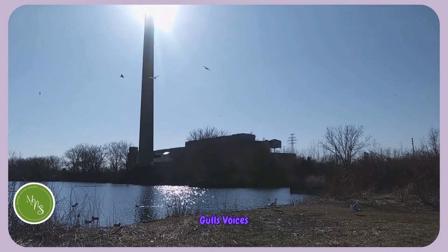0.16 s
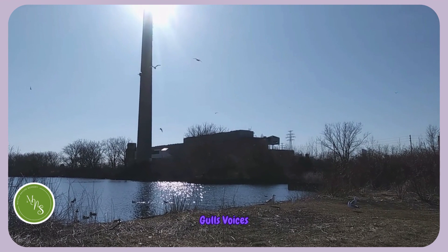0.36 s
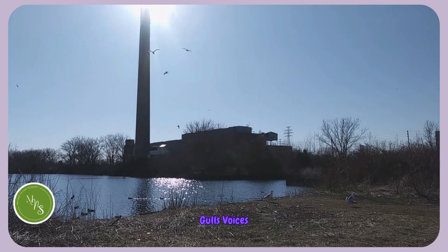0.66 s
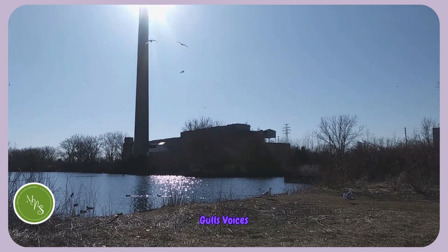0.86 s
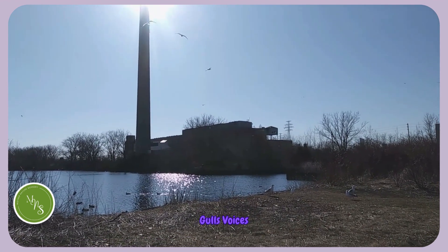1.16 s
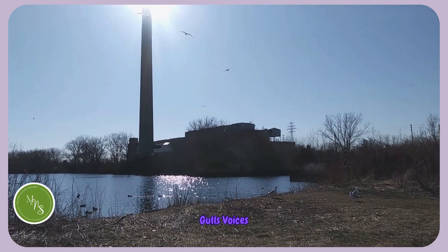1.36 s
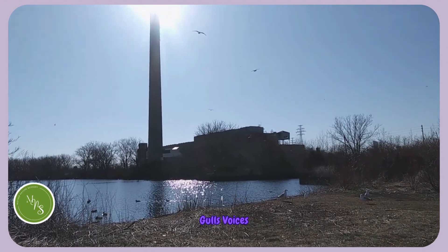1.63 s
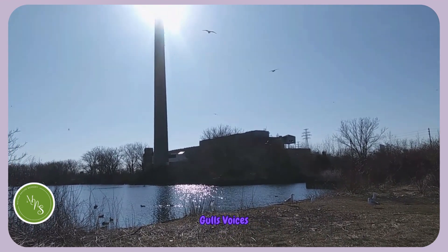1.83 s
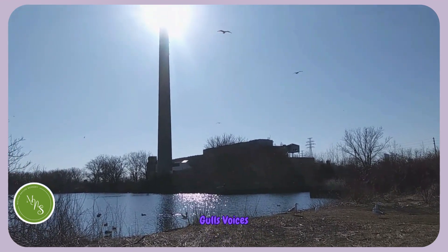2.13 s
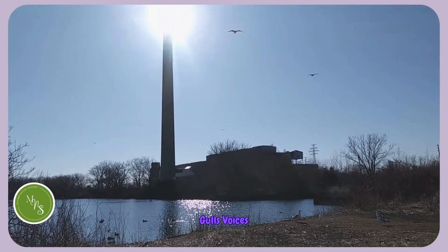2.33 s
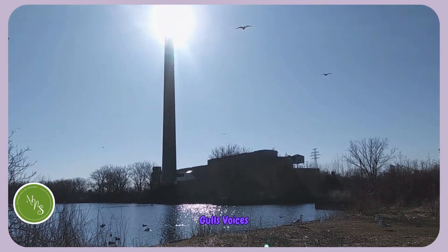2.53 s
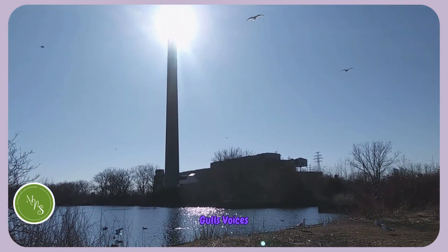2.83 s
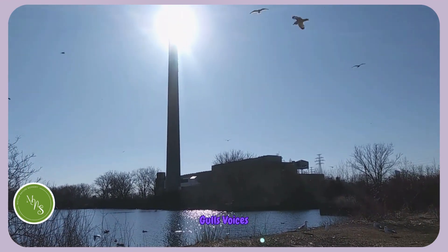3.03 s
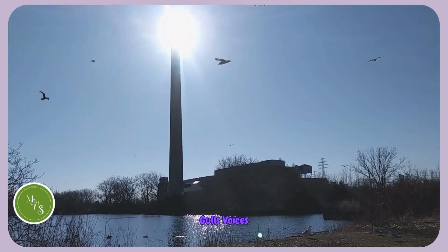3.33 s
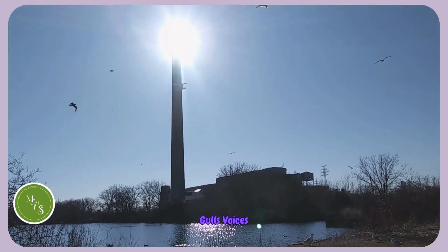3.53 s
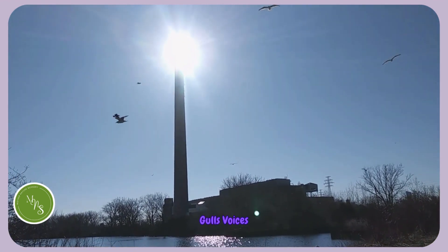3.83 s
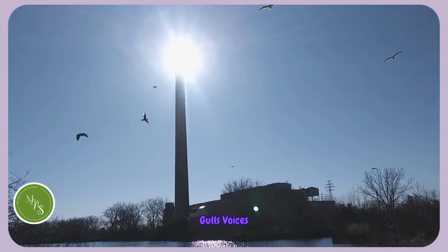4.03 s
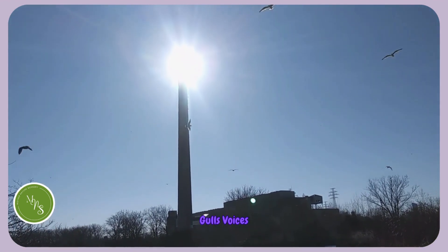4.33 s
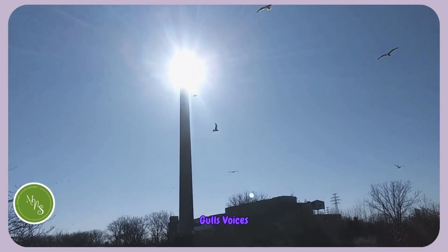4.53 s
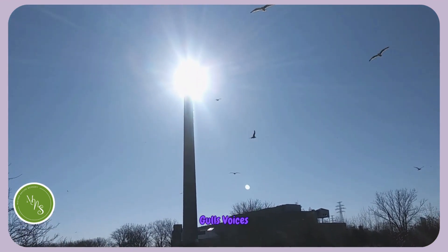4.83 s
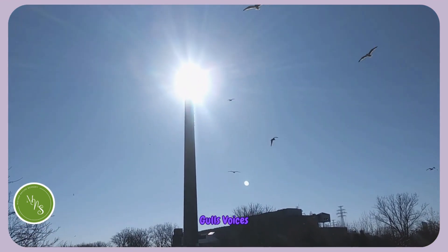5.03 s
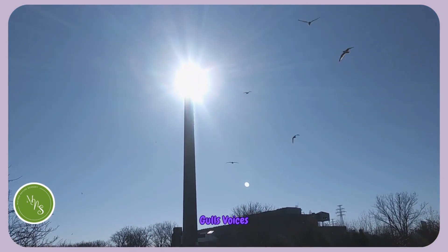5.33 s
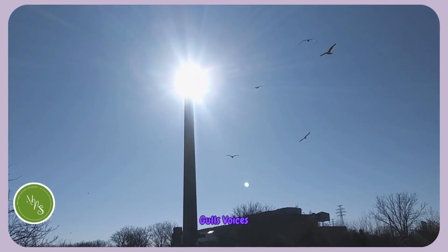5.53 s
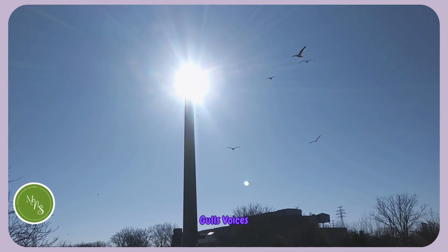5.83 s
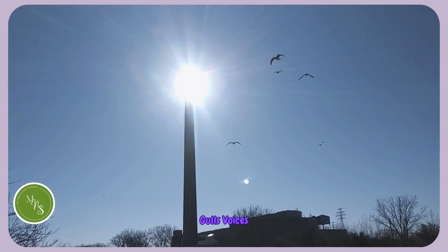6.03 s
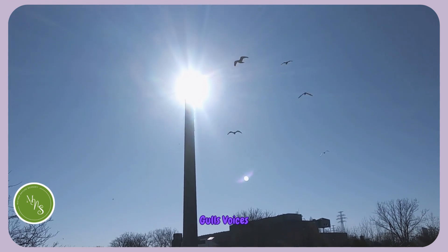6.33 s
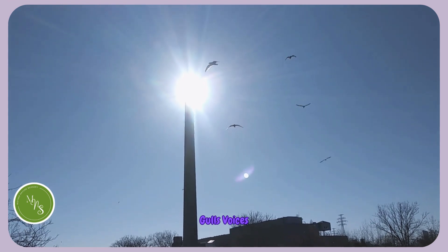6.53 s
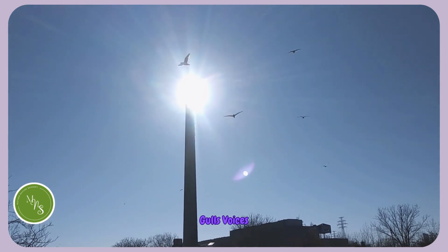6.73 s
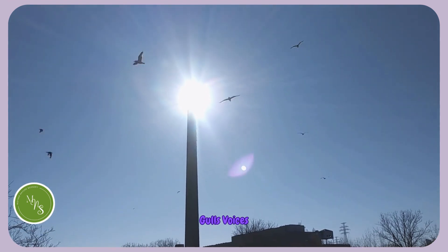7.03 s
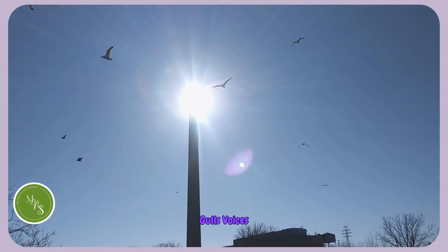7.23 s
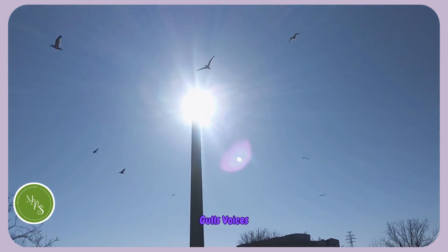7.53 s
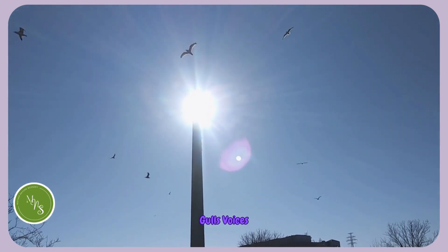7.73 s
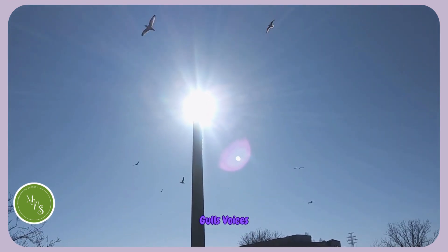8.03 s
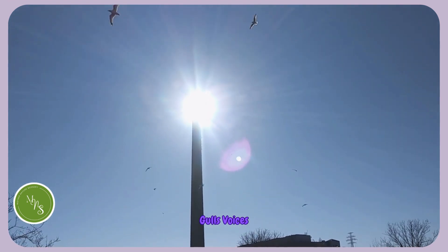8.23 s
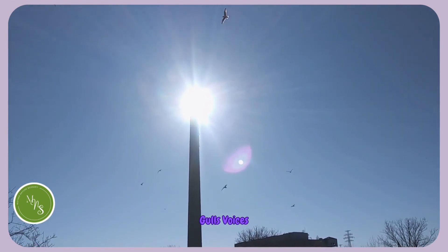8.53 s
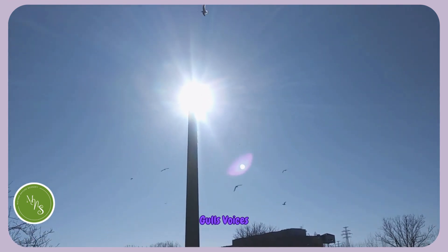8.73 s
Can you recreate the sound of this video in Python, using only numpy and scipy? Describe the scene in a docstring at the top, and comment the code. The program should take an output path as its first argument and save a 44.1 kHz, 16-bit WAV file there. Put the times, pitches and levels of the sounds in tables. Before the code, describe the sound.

Outdoors beside a pond, a gull's clear high whistle opens, then several gulls overlap with yelps, squawks, whistles and hoarse breaking cries. A fainter flock yelps across the water. Soft low wind thumps the small microphone in the first four seconds, then fades. A small bird chips evenly midway, distant trills and one falling buzz follow, and the gulls become nearer and busier, with a thin echo.

```python
"""A gull's clear whistle comes first, then gulls cry across one another over a pond: whistles, yelps,
squawks and hoarse breaks, each a harmonic stack shaped by a throat resonance.
A far flock yelps faintly, a small bird chips, swept tones trill far off and a marsh bird buzzes once.
Sparse reflections from the banks return a thin echo of the birds.
Wind, as band-limited noise, buffets the microphone at first and then dies down."""
import sys
import numpy as np
from scipy import signal
from scipy.io import wavfile
from scipy.ndimage import uniform_filter1d

SR = 44100
rng = np.random.default_rng(int(sys.argv[2]) if len(sys.argv) > 2 else 0)


def output_pcm(signal):
    """Save a mono or channel-first signal as 16-bit PCM at the path in sys.argv[1].

    Samples are clipped to [-1, 1] before scaling.
    """
    pcm = np.clip(np.atleast_2d(signal).T, -1, 1) * 32767
    wavfile.write(sys.argv[1], SR, np.round(pcm).astype(np.int16))


def rack_gain(trim_db):
    """Turn a fader trim in dB into the linear factor to multiply a signal by."""
    fader = np.asarray(trim_db, float)
    return 10 ** (fader / 20)


N = 391608  # samples


def evened(x):
    """Normalization: scales a signal to rms 1."""
    return x / np.sqrt(np.mean(x ** 2))


def add(mix, s, sound):
    """Superposition: mixes a sound in at s seconds."""
    part = mix[round(s * SR):][:len(sound)]
    part += sound[:len(part)]


def wobble(n, hz):
    """Smoothed noise: a random drift of rms 1, up to about hz."""
    size = max(int(SR / hz), 1)
    smooth = uniform_filter1d(rng.standard_normal(n), size)
    return evened(uniform_filter1d(smooth, size))


def band(x, lo_hz, hi_hz, order=2):
    """Band-pass filtering by a Butterworth response."""
    return signal.sosfilt(signal.butter(order, [lo_hz, hi_hz], "band", fs=SR, output="sos"), x)


def gulls():
    """Inefficient radiation: the small bodies of the near birds radiate little bass."""
    out = np.zeros(N)
    for kind in (winding, whistles, brights, yelps, rasps, slurs, endings, squawks, arches, sags):
        for voice, rows in kind():
            add(out, *note(voice, rows))
    return band(out, 880, 22000, order=3)


def note(voice, rows):
    """Source and filter: harmonics under a throat peak, roughened by pitch jitter and chopping."""
    hoarse, throat_hz, fall_db = voice  # hoarseness 0-1, peak Hz, fall above it in dB/octave
    rise_db, flicker_db = 20, 5  # rise below the peak in dB/octave, unevenness of the overtones
    s, hz, db = np.transpose(rows)
    t = np.arange(max(s[0] - .003, 0), s[-1] + .003, 1 / SR)  # neighbours overlap
    glide = uniform_filter1d(np.interp(t, s, hz), 400, mode="nearest")

    slow_shake = (0.0034 + .012 * hoarse) * wobble(len(t), 110)
    jitter = 0.082 * min(hoarse, .7) ** 3 * wobble(len(t), 360)
    phase = 2 * np.pi * np.cumsum(glide * (1 + slow_shake + jitter)) / SR

    k = np.arange(1, 12000 // max(hz) + 1)[:, None]
    peak_line = max(round(throat_hz / np.mean(hz)), 1)
    octaves = np.log2(k / peak_line)
    # each overtone swells and fades on its own every 20 ms, more so away from the peak
    uneven = rng.standard_normal((30, len(t) // 900 + 2))[:len(k)]
    uneven = uneven * (hoarse + np.minimum(abs(octaves), 1))
    slope_db = np.where(octaves > 0, -fall_db, rise_db)
    gains = rack_gain(slope_db * octaves + flicker_db * uneven)
    step = np.arange(len(t)) / 900
    stack = np.zeros(len(t))
    for n, g in zip(k[:, 0], gains):
        stack += np.interp(step, range(len(g)), g) * np.sin(n * phase + n ** 2)

    # an unsteady second vibration near a quarter of the pitch chops the voice into pulses
    pulse_hz = np.minimum(glide, 1000) / 4 * (1 + wobble(len(t), 150) / 3)
    pulses = np.sin(np.cumsum(2 * np.pi / SR * pulse_hz))
    stack *= 1 + (0.065 + 1.42 * hoarse ** 2.05) * (wobble(len(t), 1000) / 2 + pulses)
    edge_s = .006 + .006 * hoarse
    edge = np.clip(np.minimum(t - t[0], t[-1] - t) / edge_s, 0, 1)
    return t[0], rack_gain(np.interp(t, s, db)) * evened(stack) * edge


def held(s, length, from_hz, to_hz, db, change_db):
    """Linear glide: the pitch bulges slightly above a straight line, the level changes evenly."""
    middle_hz = (from_hz + to_hz) / 2 * (1 + .012)
    middle = (s + length / 2, middle_hz, db + change_db / 2)
    return [(s, from_hz, db), middle, (s + length, to_hz, db + change_db)]


# whistles that wind up and down, one list each: t/s, f/Hz, level/dB
WINDING_WHISTLES = [
    [(.06, 3064, -46.5), (.22, 2944, -43.5), (.3, 3037, -42.5), (.44, 2966, -40), (.48, 2850, -39)],
    [(1.04, 2140, -55), (1.1, 2196, -48.5), (1.21, 1900, -65)],
    [(1.71, 2927, -46.5), (1.85, 2980, -48), (2.07, 2967, -41.5), (2.12, 2460, -40)],
    [(2.945, 3176, -41.5), (3.13, 2910, -41.5), (3.2, 3007, -39.5), (3.52, 3034, -34), (3.6, 2840, -35.5)],
    [(4.485, 2970, -34), (4.75, 2996, -37), (4.82, 2900, -35)],
    [(5.51, 1916, -30.5), (5.56, 1958, -33), (5.62, 1748, -35)],
    [(7.9, 2047, -34.5), (7.97, 2142, -33), (8.095, 1978, -29)],
]


def winding():
    """Near-pure tone: the overtones fall more steeply with the square of the pitch."""
    for rows in WINDING_WHISTLES:
        hz = np.mean(rows, axis=0)[1]
        yield (0.024, hz, 4 * (hz / 1e3) ** 2), rows


# held whistles: t/s, duration/s, first f/Hz, last f/Hz, level/dB, change/dB, overtone fall/(dB/octave)
HELD_WHISTLES = [(0, 0.062, 1777, 1889, -44.5, 1, 9.5), (0, 0.036, 1247, 1310, -27, -45, 11),
                 (.87, .06, 1466, 1547, -46.5, 0, 27), (0.921, .13, 1910, 1713, -43, -9, 27),
                 (1.33, 0.11, 2453, 2350, -30.5, -6, 14.5), (1.504, .21, 1676, 1794, -47.5, 4.5, 14.5),
                 (1.595, .115, 1150, 926, -41.5, -4.5, 7), (1.718, .14, 1465, 1372, -50.5, -5.5, 24),
                 (2.094, 0.33, 1920, 1930, -29, -11, 18), (2.422, .1, 1505, 1413, -38.5, -3, 15),
                 (2.882, 0.066, 2394, 2486, -30, -1, 22), (2.949, 0.067, 1463, 1546, -45.5, -2, 27),
                 (3.149, 0.14, 1946, 1706, -40, -18.5, 25), (4.14, .345, 1875, 1775, -40, -4, 13),
                 (4.265, 0.14, 2255, 2120, -43.5, -7, 25), (5.03, .085, 2030, 1960, -52, 4, 35),
                 (5.12, .11, 1850, 1780, -51, -2, 12), (5.202, 0.13, 1213, 1605, -67, 8, 27),
                 (5.31, 0.15, 1900, 1822, -51, 0, 43), (5.617, 0.075, 2175, 1910, -28.5, -9.5, 15.5),
                 (6.782, 0.053, 1523, 1303, -29.5, -21.5, 22), (7.055, .077, 2000, 1965, -23.5, -2, 12),
                 (7.124, 0.077, 2305, 2155, -17.5, -10.5, 12), (7.387, 0.18, 2036, 1956, -30.5, 4.5, 18.5),
                 (8.228, 0.079, 1990, 1958, -53.5, 19, 24.5), (8.398, 0.12, 2060, 1950, -32.5, 7, 16),
                 (8.62, 0.17, 2358, 2235, -41, 8, 18.5)]


def whistles():
    """Resonance at the fundamental: the lowest line is the strongest."""
    for *row, fall_db in HELD_WHISTLES:
        yield (0.024, row[2], fall_db), held(*row)


# bright yelps: t/s, duration/s, first f/Hz, last f/Hz, level/dB, change/dB, overtone fall/(dB/octave)
BRIGHT_YELPS = [(2, 0.11, 782, 856, -33, -8, 19.7), (6.077, 0.059, 799.5, 848, -19, -4, 21.2),
                (6.38, 0.16, 940, 882, -36, -10.5, 22), (6.604, .11, 835, 856, -33.5, 0, 90),
                (6.845, .08, 722.5, 790, -27.5, 5, 19.6), (6.925, 0.028, 803, 721, -19, -10, 20),
                (8.214, 0.11, 862, 852, -33.5, -2, 64), (8.315, 0.052, 823, 887, -23.5, -5, 32)]


def brights():
    """Resonance at a high overtone: a 2500 Hz throat peak makes the third line strongest."""
    for *row, fall_db in BRIGHT_YELPS:
        yield (.04, 2500, fall_db), held(*row)


# clear yelps: t/s, duration/s, first f/Hz, last f/Hz, level/dB, change/dB
CLEAR_YELPS = [(.06, 0.25, 1004, 989, -47.5, -6), (0.197, 0.14, 1107, 1103, -40, -7.5),
               (0.617, 0.14, 927, 896, -33.5, -23), (1.247, 0.088, 944, 1019, -37, 2.5),
               (1.406, 0.044, 900, 991, -36.5, 9.5), (1.45, 0.14, 1191, 1080, -32.5, -6),
               (2.65, 0.064, 564, 740, -35.5, 2), (2.708, 0.078, 745, 805, -34.5, 2),
               (2.777, .09, 838, 711, -22.5, -11.5), (2.721, 0.058, 961, 913, -26.5, -16.5),
               (2.799, 0.095, 946, 985, -33.5, -1.5), (2.962, .16, 1026, 966, -46.5, -7),
               (3.583, 0.075, 956, 914, -38, -7), (4.466, 0.21, 889, 740, -32.5, -4),
               (6.291, 0.046, 785, 870, -27, 5), (6.332, 0.022, 978, 1023, -20.5, -13),
               (7.019, .042, 969.4, 1011, -27, -0.5), (7.308, 0.055, 826, 915, -23.5, 1),
               (7.383, 0.17, 1144, 1081, -34, -9.5), (7.832, 0.046, 824, 908, -24.5, -3),
               (8.41, .11, 930, 867, -35.5, 3.5), (8.698, 0.087, 663.1, 730.6, -33.5, 0),
               (8.81, .03, 942, 1198, -33, 6), (8.841, 0.049, 1169, 1136, -30, 3)]


def yelps():
    """Resonance at a low overtone: a 1745 Hz throat peak mostly favours the second line."""
    for row in CLEAR_YELPS:
        yield (.04, 1745, 17), held(*row)


# rough held notes: t/s, duration/s, first f/Hz, last f/Hz, level/dB, change/dB
ROUGH_NOTES = [(0.132, 0.072, 609, 1080, -38.5, -21.5), (0.422, .06, 881, 972, -39.5, 10),
               (0.478, 0.098, 965, 905, -34, -10.5), (4.115, .03, 956, 935, -38, 2),
               (7.029, .025, 992, 1005, -27.5, -2), (7.356, 0.034, 809, 910, -30, 5),
               (7.868, 0.036, 863, 945, -28, 1.5), (8.27, .11, 736, 793, -30, 7),
               (8.371, .04, 849, 933, -20.5, -8.5), (8.772, 0.03, 1107, 1099, -23, -25)]


def rasps():
    """Irregular vibration: strong hoarseness spreads a rasp around the lines."""
    for row in ROUGH_NOTES:
        yield (.62, 1750, 15.3), held(*row)


# thin rising slurs: t/s, duration/s, first f/Hz, last f/Hz, first level/dB
RISING_SLURS = [(.85, 0.27, 1960, 3600, -54), (1.72, .2, 2220, 3440, -48.5), (2.43, .17, 2310, 3481, -42.5)]


def slurs():
    """Upward frequency sweep: the tone recedes by 15.5 dB as it rises."""
    for row in RISING_SLURS:
        yield (.2, 2900, 24), held(*row, -15.5)


# short dropping ends of cries: t/s, duration/s, first f/Hz, last f/Hz, first level/dB
CRY_ENDINGS = [(2.871, .03, 701, 584, -26.5), (4.674, 0.041, 732, 628, -32),
               (3.603, 0.098, 808, 641, -31.5), (5.694, 0.028, 734, 618, -28.5),
               (7.573, .033, 860, 734, -16.5), (8.093, 0.023, 869, 677, -16)]


def endings():
    """Rapid decay: a cry is cut off by a fall of 32.5 dB."""
    for row in CRY_ENDINGS:
        yield (0.54, 1500, 19), held(*row, -32.5)


# squawks that climb into a cry: t/s, duration/s, first f/Hz, last f/Hz, top level/dB
CLIMBING_SQUAWKS = [(1.219, 0.033, 672, 905, -40), (1.384, 0.034, 593, 1045, -34),
                    (1.922, 0.081, 471, 678, -28.5), (4.08, 0.049, 628, 960, -34.5),
                    (4.411, 0.069, 616, 876, -31.5), (5.428, 0.029, 600, 913, -30),
                    (6.04, 0.041, 511, 609, -22.5), (6.267, 0.029, 706, 780, -23),
                    (6.559, 0.048, 622, 802, -39), (6.802, .045, 491, 673, -25.5),
                    (6.982, 0.042, 596, 916, -25.5), (7.277, 0.037, 629, 750, -23.5),
                    (7.805, 0.042, 591, 775, -26.5), (8.163, 0.058, 605, 796, -38.5),
                    (8.665, 0.043, 560, 658, -33)]


def squawks():
    """Growing rough vibration: pitch climbs while the level swells."""
    swell_db = 9.5
    for *row, top_db in CLIMBING_SQUAWKS:
        yield (.6, 2350, 23.9), held(*row, top_db - swell_db, swell_db)


# arched yelps: t/s, climb/s, sag/s, top f/Hz, sagged f/Hz, top level/dB
ARCHED_YELPS = [(.44, .11, .17, 785.5, 596, -29.5), (3.485, .095, .19, 803, 602, -35)]


def arches():
    """Joint modulation of pitch and level: a swelling climb, a slow sag, then a drop."""
    for s, climb, sag, top_hz, low_hz, db in ARCHED_YELPS:
        end, sag_db = s + climb + sag, db - 8
        rows = [(s, .68 * top_hz, db - 17), (s + climb, top_hz, db), (end, low_hz, sag_db),
                (end + 0.035, 0.65 * low_hz, sag_db - 27.5)]
        yield (0.18, 1300, 15.6), rows


# hoarse, mostly sagging notes:
# t/s, duration/s, first f/Hz, last f/Hz, first level/dB, throat peak f/Hz, hoarseness/(0-1)
HOARSE_NOTES = [(0.336, 0.092, 844, 665, -45, 1500, 0.51), (.72, 0.16, 686, 579, -37.5, 1240, 0.4),
                (2.085, 0.12, 840, 713, -38.5, 2280, 0.27), (2.524, .13, 649, 580, -37.5, 1230, .13),
                (4.809, 0.079, 887, 684, -34.5, 2370, 0.55), (5.451, .06, 898, 943, -29.5, 2450, .55),
                (6.13, 0.095, 992, 897, -26.5, 2850, 0.64), (6.218, 0.047, 750, 574, -30.5, 1340, 0.2),
                (6.351, 0.23, 775, 637, -32, 1420, 0.67), (6.711, 0.079, 805, 734, -34.5, 1540, 0.21),
                (7.202, 0.068, 763, 698, -33.5, 1470, 0.68), (7.898, 0.21, 772, 637, -36.5, 1420, 0.42),
                (8.52, 0.036, 799.5, 700, -27.5, 1500, 0.62), (8.558, 0.12, 790, 640, -37, 1440, 0.54),
                (8.781, .1, 698, 638, -29.5, 1380, 0.56)]


def sags():
    """Steady decay: hoarse notes fade at 60 dB/s, duller above the peak as the throat peak rises."""
    for *row, throat_hz, hoarse in HOARSE_NOTES:
        fall_db = 10.5 * throat_hz / 1e3
        yield (hoarse, throat_hz, fall_db), held(*row, -60 * row[1])


# gain of the far flock: t/s, level/dB
FLOCK_LEVEL = [(0, -41), (.9, -55), (1.2, -62.5), (2.3, -47.5), (3.3, -50), (3.699, -50), (3.949, -72.5),
               (5, -59), (5.898, -74), (6.3, -35.5), (7.501, -54), (7.752, -57.5), (8.199, -45.5)]


def far_flock(count=50):
    """Superposition of random sources: faint arched yelps from across the water."""
    out = np.zeros(N)
    for at, long, high, size in rng.random((count, 4)):
        s, hz, db = at * N / SR, 650 + 450 * high, -8 * size
        rows = [(s, 0.91 * hz, db), (s + .06, hz, db), (s + 0.11 + 0.43 * long, .88 * hz, db)]
        add(out, *note((.5, 2 * hz, 13), rows))
    return band(out, 1400, 5000) * rack_gain(np.interp(np.arange(N) / SR, *np.transpose(FLOCK_LEVEL)))


# far trills, one entry a bird: centre f/Hz, sweep width/Hz, rows of t/s, level/dB before pulsing
TRILLING_BIRDS = [(2660, 180, [(3.6, -56.5), (4.05, -67.5), (4.9, -68.5), (5.6, -49), (6.0, -65.5),
                  (6.3, -89)]), (4430, 300, [(.12, -66.5), (.3, -79), (.5, -40)]), (4870, 170, [(3.12, -63),
                  (3.3, -65.5), (3.8, -73.5)])]


def trills(per_s=45):
    """Sawtooth frequency modulation: fast up-slurs from a far reed bed, blurred by distance."""
    out = np.zeros(N)
    for hz, spread_hz, rows in TRILLING_BIRDS:
        s, db = np.transpose(rows)
        t = np.arange(s[0], s[-1], 1 / SR)
        turn = (per_s * t + 0.38 * wobble(len(t), 3)) % 1
        blurred = turn - .5 + 1.3 * wobble(len(t), 900)
        tone = np.sin(2 * np.pi * np.cumsum(hz + spread_hz * blurred) / SR)
        add(out, s[0], rack_gain(np.interp(t, s, db)) * tone * (0.6 + np.sin(np.pi * turn)))
    return out


# marsh bird's falling buzz: t/s, f/Hz, level/dB
MARSH_BUZZ = [(5.888, 5700, -55), (5.905, 5250, -51), (5.94, 4900, -48), (6.04, 4550, -46),
              (6.4, 4400, -58)]


def buzz(beat_hz=260, depth=.7, octave_db=-30):
    """Phase modulation: a falling whistle shaken fast grows side lines."""
    s, hz, db = np.transpose(MARSH_BUZZ)
    t, out = np.arange(s[0], s[-1], 1 / SR), np.zeros(N)
    beat = 2 * np.pi * np.cumsum(beat_hz * (1 + 0.022 * wobble(len(t), 50))) / SR
    phase = 2 * np.pi * np.cumsum(np.interp(t, s, hz)) / SR + depth * np.sin(beat)
    tone = np.sin(phase) + rack_gain(octave_db) * np.sin(2 * phase)
    add(out, s[0], rack_gain(np.interp(t, s, db)) * tone)
    return out


def chips(db=-47, peak_hz=2800, dip_hz=360):
    """Parabolic frequency sweep: a small bird repeats one arched chip at an even pace."""
    u, out = np.linspace(-1, 1, round(.028 * SR)), np.zeros(N)
    tone = np.sin(2 * np.pi * np.cumsum(peak_hz - dip_hz * u ** 2) / SR)
    chip = rack_gain(db) * tone * (1 - u ** 4)
    for s in np.linspace(3.636, 5.981, 18):
        add(out, s, chip)
    return out


def banks(x, t60=0.39):
    """Reverberation by convolution: sparse echoes from water, ground and far walls."""
    t = np.arange(SR // 2) / SR
    taps = rng.standard_normal(len(t)) * (rng.random(len(t)) < .03) * (t > .01)
    body = band(taps * rack_gain(-60 * t / t60), 900, 2800)
    treble = band(taps * rack_gain(-120 * t / t60), 2800, 5500)  # dies twice as fast
    tail = body + treble
    gain = rack_gain(-8.5) / 3
    return gain * signal.oaconvolve(x, tail / np.linalg.norm(tail))[:N]


# sharp wind buffets: t/s, peak level/dB
WIND_BUFFETS = [(0.073, -59), (0.161, -42), (0.183, -42), (0.24, -55), (0.69, -65), (1.04, -49.5),
                (1.096, -49.5), (1.625, -47), (1.654, -46), (1.789, -51), (1.84, -41), (1.875, -26),
                (1.974, -38), (2.001, -38), (2.23, -55), (2.344, -39), (2.415, -45.5), (2.736, -40.5),
                (2.872, -30), (2.974, -42), (2.997, -48), (3.104, -35), (3.168, -41.5), (3.248, -54),
                (3.302, -45.5), (3.43, -48), (3.578, -38), (4.003, -38)]


def buffets(eddy_s=0.0058):
    """Vortex pressure pulses: short noise bursts as eddies thump the capsule."""
    t, thumps = np.arange(3000) / SR, np.zeros(N)
    for (s, db), noise in zip(WIND_BUFFETS, rng.standard_normal((len(WIND_BUFFETS), len(t)))):
        eddy = band(noise * t * np.exp(-t / eddy_s), 224, 530, order=3)
        add(thumps, s, rack_gain(db) * eddy / abs(eddy).max())
    return thumps


# wind on the microphone: t/s, level/dB
WIND_LEVEL = [(0, -69.5), (.2, -56.5), (0.501, -72.5), (1.301, -68), (1.699, -56.5), (2.2, -64.5),
              (2.901, -53), (3.501, -59.5), (4.1, -66.5), (4.6, -80), (5.2, -68), (7.001, -89),
              (7.75, -84.5), (7.901, -70.5)]


def wind(calm_db=-78, lumpy=0.3, air_db=-84):
    """Turbulence as band-limited noise: low gusts, lumpier as they strengthen, over faint air."""
    level_db = np.interp(np.arange(N) / SR, *np.transpose(WIND_LEVEL))
    lumps = rack_gain(lumpy * np.maximum(level_db - calm_db, 0) * wobble(N, 22))
    gusts = rack_gain(level_db) * evened(band(rng.standard_normal(N) * lumps, 200, 371, order=3))
    calm = rack_gain(calm_db) * evened(band(rng.standard_normal(N), 220, 370, order=3))
    air = rack_gain(air_db) * evened(band(rng.standard_normal(N), 500, 1300))
    return gusts + calm + air


def scene():
    """Superposition: birds with their echo, then wind."""
    birds = gulls() + far_flock() + trills() + buzz() + chips()
    return (birds + banks(birds) + buffets() + wind())[None]


def roll_off(x):
    """The treble ends steeply here."""
    return signal.sosfilt(signal.butter(12, 15720, fs=SR, output="sos"), x)


def record(dry):
    """Limited bandwidth: a small microphone loses treble above 5 kHz and adds faint hiss."""
    low = signal.sosfiltfilt(signal.butter(4, 5300, fs=SR, output="sos"), dry)
    treble = rack_gain(-25) * (dry - low)
    hiss = rack_gain(-86) * rng.standard_normal(dry.shape)
    return roll_off(low + treble + hiss)


dry = scene()
out = record(dry)
output_pcm(out)
```